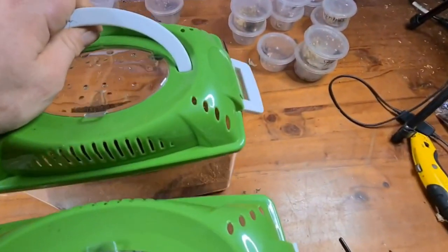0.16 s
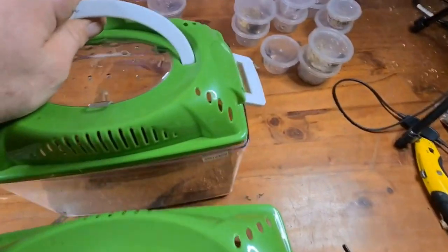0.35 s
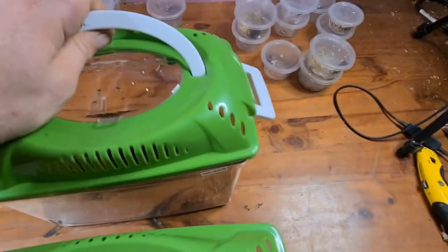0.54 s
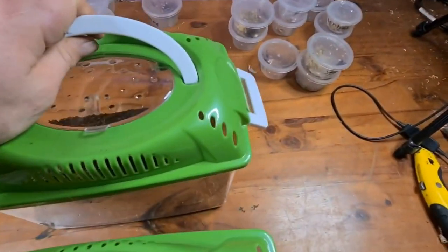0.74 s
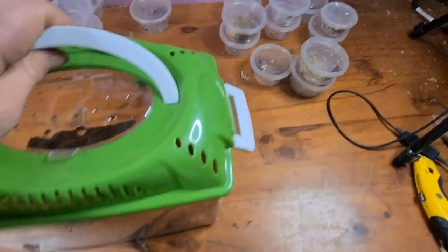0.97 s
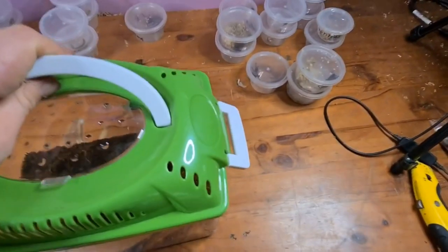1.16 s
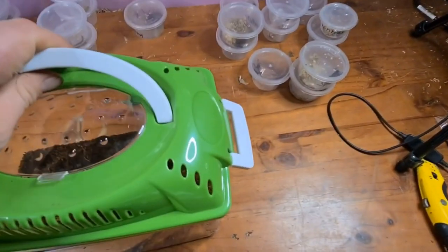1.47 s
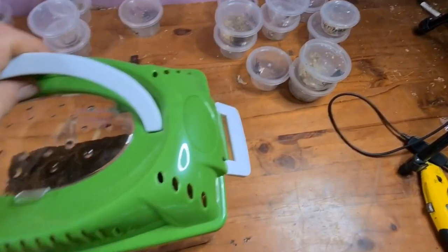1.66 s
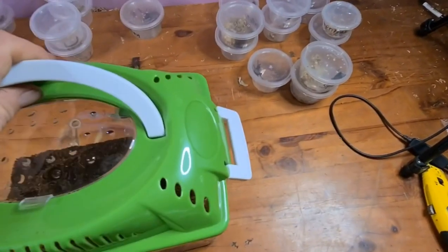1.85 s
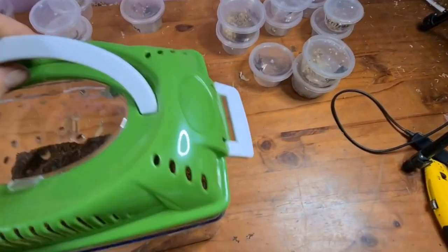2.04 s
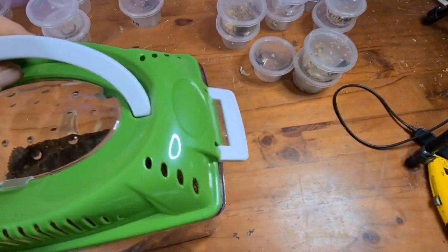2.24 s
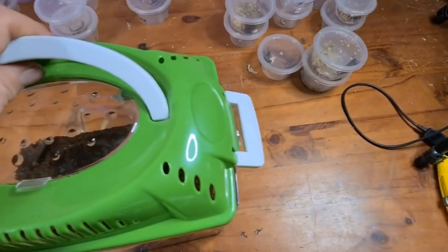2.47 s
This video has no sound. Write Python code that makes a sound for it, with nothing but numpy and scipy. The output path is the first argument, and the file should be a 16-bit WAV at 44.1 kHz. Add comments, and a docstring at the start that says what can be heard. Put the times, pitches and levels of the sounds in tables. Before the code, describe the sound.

Hollow plastic knocks with brief rim scrapes: a dense rattle first, one heavier knock, quieter fumbling, a near lull, then crisp clacks and a strong final double knock. Close stereo microphone, dry indoor space.

```python
"""A plastic lid knocks and scrapes over a clear tub on a wooden table and is pressed shut, close by.
Knocks: each contact excites a shell of noise overtones and sine modes, plus low sines for the tub.
Scrapes: random stick-slip impulses drive the same shell. Pings: narrow resonances with drifting phase.
Behind them lies the faint hum and hiss of a small quiet room, made of shaped noise."""
import sys
import numpy as np
from scipy import signal
from scipy.fft import rfft, irfft, next_fast_len
from scipy.io import wavfile

SR = 44100
rng = np.random.default_rng(int(sys.argv[2]) if len(sys.argv) > 2 else 0)


def unload_wav(signal):
    """Save mono or channel-first audio to the path in sys.argv[1] as 16-bit WAV at rate SR, clipped to [-1, 1]."""
    wavfile.write(
        sys.argv[1],
        SR,
        np.round(np.clip(np.atleast_2d(signal).T, -1, 1) * 32767).astype(np.int16),
    )


N = 114660
RING_S = 0.22  # length of one computed ring
TOP_HZ = 16100  # band limit

STRIKE_S = 0.02  # a contact's levels hold over this span
SOFT_RISE_S, SOFT_SNAP_DB = 0.00047, -18  # rise time constant at this snap-over-body level
HARDNESS_DB = 30  # this much more snap over body shortens the rise by 1/e
LEAD_IN_DB, LEAD_IN_SWELL_S = -13, 0.0052  # reference level at softness 1, growth time constant
LEAD_IN_S, LEAD_IN_STEP_S = 0.018, 0.002
# contacts of lid and tub [start_s, thump_db, body_db, clack_db, snap_db]
CONTACTS = [(0.074, -71, -42.5, -40, -59), (0.09, -48, -36, -33, -48), (0.27, -41, -32, -36.5, -52.5),
            (0.299, -40, -47, -42, -58.5), (0.318, -62, -31, -44, -57.5), (0.36, -66, -35, -48, -50),
            (0.389, -60, -37.5, -40, -52), (0.396, -49, -37, -38, -47), (0.405, -44, -39, -33.5, -51.5),
            (0.46, -46, -38.5, -44.5, -47.5), (0.612, -60, -53.5, -59, -76), (0.641, -58.5, -89, -73, -69),
            (0.702, -57, -44.5, -60.5, -79.5), (0.745, -55, -49.5, -52.5, -62),
            (0.755, -55, -42.5, -45, -57.5), (0.812, -53, -40.5, -53.5, -62.5),
            (0.883, -73, -38.5, -40, -58.5), (0.895, -33.5, -34.5, -33.5, -40), (0.987, -71, -49, -57, -76),
            (1.016, -64, -44, -52.5, -66.5), (1.065, -69, -52, -52, -90), (1.156, -67, -62, -64.5, -83.5),
            (1.257, -92, -58, -79.5, -93), (1.316, -77, -58, -68.5, -88), (1.367, -59, -45.5, -56, -76),
            (1.4, -72, -45.5, -50, -64.5), (1.417, -49, -48, -72, -80), (1.453, -44.5, -54, -49.5, -66.5),
            (1.464, -39, -37.5, -41.5, -57.5), (1.553, -58, -67.5, -61, -78.5),
            (1.66, -87.5, -97.5, -69, -97), (1.765, -72.5, -72, -72.5, -78), (1.9285, -62, -38, -34, -40),
            (1.948, -42, -35, -35, -42), (2.036, -47, -41.5, -57, -72), (2.071, -53, -42.5, -52, -85),
            (2.118, -42, -41, -42.5, -60.5), (2.251, -74, -38.5, -51, -59),
            (2.264, -39.5, -44.5, -43.5, -60.5), (2.313, -50, -50.5, -90, -74.5),
            (2.389, -48, -44, -45.5, -62), (2.398, -37, -29.5, -36.5, -43),
            (2.408, -33.5, -30.5, -31, -47.5)]
# share of the rise time for thump, body, clack, snap [ratio]
RISE_SHARE = [1, 1, .5, .25]


def knocks():
    """Soft contacts rise slowly as the plastic gives, hard ones fast; swelling rim slips lead in."""
    out = np.zeros((2, N))
    t = np.arange(int(RING_S * SR)) / SR
    for start_s, thump_db, body_db, clack_db, snap_db in CONTACTS:
        softness = np.exp((SOFT_SNAP_DB - snap_db + body_db) / HARDNESS_DB)
        rise_s = SOFT_RISE_S * softness * np.reshape(RISE_SHARE, (-1, 1, 1))
        bands = shell() * (1 - np.exp(-t / rise_s))
        blow = blend(bands, [thump_db, body_db, clack_db, snap_db], STRIKE_S)
        add(out, start_s, blow)
        for ahead_s in np.arange(LEAD_IN_STEP_S, LEAD_IN_S, LEAD_IN_STEP_S):
            swell = np.exp(-ahead_s / LEAD_IN_SWELL_S)
            gain = softness * amp(LEAD_IN_DB) * swell * rng.choice([-1, 1])
            slip_s = start_s - ahead_s - LEAD_IN_STEP_S * rng.random()
            add(out, slip_s, gain * blow)
    return out


SLIPS_PER_S, SLIP_SCATTER_DB, SCRAPE_FADE_S = 380, 3, 0.005
SCRAPE_DULL_DB = 14.5  # snap lies this far under clack
# the rim dragging [start_s, length_s, thump_db, body_db, clack_db]
SCRAPES = [(.0, 0.043, -61, -58.5, -65.5), (0.041, 0.11, -66, -43.5, -52.5),
           (0.114, 0.054, -43.5, -42, -44.5), (0.171, 0.073, -63, -52, -65), (0.282, 0.14, -41, -39, -42),
           (.465, 0.038, -42.5, -52, -49), (0.766, 0.045, -59, -56.5, -58.5),
           (0.997, 0.095, -47.5, -52.5, -60), (1.211, 0.15, -73, -63.5, -75),
           (1.374, 0.14, -56, -51.5, -62), (1.56, 0.032, -59, -60.5, -103), (1.72, 0.058, -78.5, -69, -79),
           (1.987, 0.11, -65, -46, -58.5), (2.283, 0.066, -58, -62.5, -78)]


def scrapes():
    """The rim sticks and slips at random times; each slip rings the shell."""
    out = np.zeros((2, N))
    t = np.arange(int(RING_S * SR)) / SR
    for start_s, length_s, thump_db, body_db, clack_db in SCRAPES:
        hits = rng.random(len(t)) < SLIPS_PER_S / SR
        sizes = amp(SLIP_SCATTER_DB * rng.standard_normal(len(t)))
        slips = hits * sizes * rng.choice([-1, 1], len(t))
        stroke = np.clip(np.minimum(t, length_s - t) / SCRAPE_FADE_S, 0, 1)
        bands = signal.fftconvolve(shell(), (slips * stroke)[None, None], axes=-1)
        levels_db = [thump_db, body_db, clack_db, clack_db - SCRAPE_DULL_DB]
        add(out, start_s, blend(bands, levels_db, length_s))
    return out


PING_T60_S, PING_RISE_S = 0.11, 0.002
PING_DRIFT_PER_S = 9.2  # phase variance grows by pi times this, in rad^2 per s
# lid ringing where its rim slips free or seats; the spot sets the pitch [start_s, pitch_hz, gain_db]
PINGS = [(.396, 6480, -39.5), (0.405, 2790, -33), (0.895, 161.7, -23.5), (1.553, 1566, -58),
         (1.762, 202, -48.5), (1.949, 479, -26), (2.071, 1670, -46), (2.116, 2045, -42.5),
         (2.41, 460, -30.5)]


def pings():
    """A narrow rim resonance: a decaying sine whose phase drifts separately left and right."""
    out = np.zeros((2, N))
    t = np.arange(int(RING_S * SR)) / SR
    fade = amp(-60 * t / PING_T60_S) * -np.expm1(-t / PING_RISE_S)
    for start_s, pitch_hz, gain_db in PINGS:
        steps = rng.standard_normal((2, len(t))) * np.sqrt(np.pi * PING_DRIFT_PER_S / SR)
        waver = np.cumsum(steps, axis=1)
        add(out, start_s, amp(gain_db) * fade * np.sin(2 * np.pi * pitch_hz * t + waver))
    return out


THUMP_RISE_S, THUMP_LOW_HZ = 0.008, 40
# modes of the tub on the table, relative levels [pitch_hz, level_db, t60_s]
TUB = [(53, 1.5, 0.084), (65.3, 0, 0.21), (81, -3, 0.16)]


def tub_thump(t):
    """The hollow tub on the table: a few low decaying modes with a gradual onset."""
    modes = sum(amp(db - 60 * t / t60_s) * np.sin(2 * np.pi * hz * t) for hz, db, t60_s in TUB)
    high_pass = signal.butter(4, THUMP_LOW_HZ, "high", fs=SR, output="sos")
    return signal.sosfilt(high_pass, modes * (1 - np.exp(-t / THUMP_RISE_S)))


CRACK_DB, CRACK_T60_S = 0, 0.0055  # added copy of the overtones; this decay multiplies theirs
MODE_DB, MODE_SCATTER_DB, DETUNE = -6.5, 2.5, 0.011  # DETUNE: standard deviation, ratio
# modes of the lid, relative levels [pitch_hz, level_db]
LID = [(159, -1), (192, -1), (273, 1), (342, -5), (468, 1), (600, -8.5), (965, -5.5), (1044, -8.5),
       (1620, -8.5), (2780, -9.5)]
# colour of the shell's dense overtones [pitch_hz, level_db]
SHELL = [(100, 1.5), (260, 17.5), (480, 6), (1300, 1.5), (1800, 8), (2400, -3.5), (6500, -15),
         (16000, -31.5)]
# decay of shell and room together [pitch_hz, t60_s]
RING_T60 = [(150, 0.22), (320, 0.13)]
# lower edges of body, clack, snap [edge_hz]
BAND_EDGES_HZ = [125, 700, 3500]


def shell():
    """One blow's answer in four bands: tub thump, then the lid's body, clack and snap."""
    t = np.arange(int(RING_S * SR)) / SR
    hz, frame_s, spectrum = signal.stft(noise(SHELL, size=len(t)), SR, nperseg=256)
    decay = amp(-60 * frame_s / along(RING_T60, hz)[:, None])
    ring = signal.istft(spectrum * decay, SR, nperseg=256)[1][:, :len(t)]
    ring = ring * (1 + amp(CRACK_DB - 60 * t / CRACK_T60_S))
    draws = rng.standard_normal((len(LID), 3))
    for (mode_hz, level_db), (size, pitch, phase) in zip(LID, draws):
        fade = amp(MODE_DB - 60 * t / along(RING_T60, mode_hz))
        spread = half_angle(mode_hz) * np.array([[-1], [1]]) * rng.choice([-1, 1])
        angle = 2 * np.pi * (mode_hz * (1 + DETUNE * pitch) * t + phase) + spread
        ring += amp(level_db + MODE_SCATTER_DB * size) * fade * np.sin(angle)
    thump = tub_thump(t)
    bands = [[thump, thump]]
    edges = list(BAND_EDGES_HZ) + [TOP_HZ]
    for pair in zip(edges, edges[1:]):
        bands.append(signal.sosfilt(signal.butter(3, pair, "band", fs=SR, output="sos"), ring))
    return np.array(bands)


TOP_TILT = 0.93  # share of the clack-to-snap step that carries on to TOP_HZ
PLACE_DB = 4  # each point of contact favours other overtones
# centres of body, clack, snap [centre_hz]
BAND_CENTRES_HZ = [240, 1600, 8000]


def blend(bands, levels_db, length_s):
    """Tilt the ring smoothly through the body, clack and snap levels, then sum with the thump."""
    body, clack, snap = band_gains(bands, levels_db, length_s)[1:]
    top = snap + TOP_TILT * (snap - clack)
    tilt = list(zip(list(BAND_CENTRES_HZ) + [TOP_HZ], [body, clack, snap, top]))
    place_hz = np.geomspace(BAND_EDGES_HZ[0], TOP_HZ, 30)
    place = np.column_stack([place_hz, PLACE_DB * rng.standard_normal(30)])
    lid = filtered(bands[1:], lambda hz: amp(along(tilt, hz) + along(place, hz)))
    bands = np.concatenate([bands[:1], lid])
    return np.tensordot(amp(band_gains(bands, levels_db, length_s)), bands, 1)


def band_gains(bands, levels_db, length_s):
    """The dB that bring each band's left-right mean to its level over the first length_s."""
    mono = bands[..., :int(length_s * SR)].mean(axis=1)
    power = np.mean(mono ** 2, axis=1)
    return np.asarray(levels_db) - 10 * np.log10(power + 1e-20)


FLOOR_DB = -75  # rms
# hum and hiss of the quiet room, relative levels [pitch_hz, level_db]
FLOOR = [(25, -16), (68, 0), (130, -14), (900, -31), (15000, -45)]


def room_floor():
    """Steady room hum and hiss: noise weighted to the bass."""
    return amp(FLOOR_DB) * noise(FLOOR, size=N)


# left-right likeness over frequency [pitch_hz, correlation]
ALIKE = [(250, 0.97), (600, 0.53), (1300, 0.41), (3000, -0.077)]


def half_angle(hz):
    """Half the left-right angle whose cosine is the likeness, in radians."""
    return np.arccos(np.clip(along(ALIKE, hz), -1, 1)) / 2


def noise(spectrum, size):
    """Coloured stereo noise of rms 1, near mono in the bass."""
    def response(hz):
        return amp(along(spectrum, hz)) * [np.cos(half_angle(hz)), np.sin(half_angle(hz))]
    mid, side = filtered(rng.standard_normal((2, size)), response)
    pair = np.array([mid + side, mid - side])
    return pair / pair.std()


def amp(db):
    """Decibels to gain."""
    return 10 ** (np.asarray(db) / 20)


def along(points, hz):
    """Interpolate (Hz, value) points on a log frequency axis."""
    f, v = np.transpose(points)
    return np.interp(np.log(hz + 1), np.log(f + 1), v)


def filtered(x, response):
    """Multiply the spectrum of x by a response of frequency."""
    n = x.shape[-1]
    m = next_fast_len(n + 2048)
    return irfft(rfft(x, m) * response(np.fft.rfftfreq(m, 1 / SR)), m)[..., :n]


def add(track, start_s, sound):
    """Mix a sound into the track at start_s."""
    part = track[:, max(0, round(start_s * SR)):][:, :sound.shape[1]]
    part += sound[:, :part.shape[1]]


LEFT_LEAD_S = 0.00028


def scene():
    """Knocks and scrapes reach the left channel first; pings and room floor are added."""
    sides = np.array([[1], [-1]])
    contact = knocks() + scrapes()
    lid = filtered(contact, lambda hz: np.exp(1j * np.pi * hz * LEFT_LEAD_S * sides))
    return lid + pings() + room_floor()


def record(dry):
    """Cut steeply above the band limit."""
    return filtered(dry, lambda hz: 1 / (1 + (hz / TOP_HZ) ** 120))


dry = scene()
out = record(dry)
unload_wav(out)
```